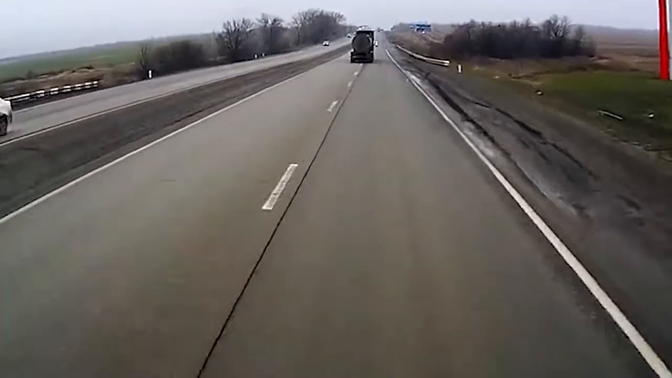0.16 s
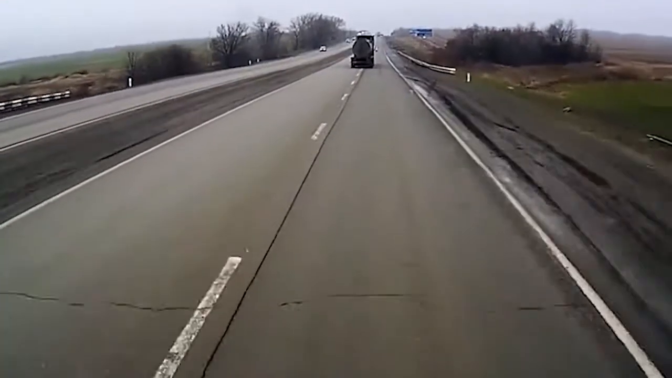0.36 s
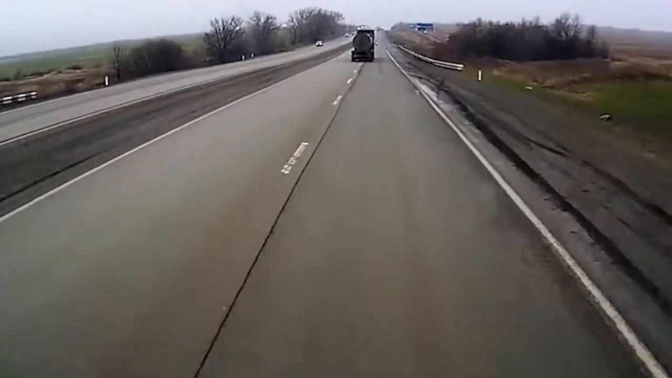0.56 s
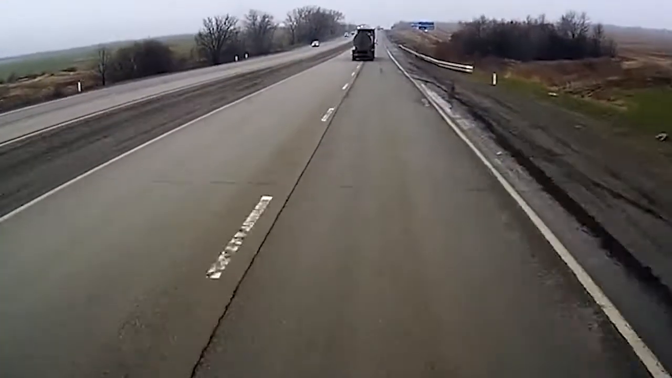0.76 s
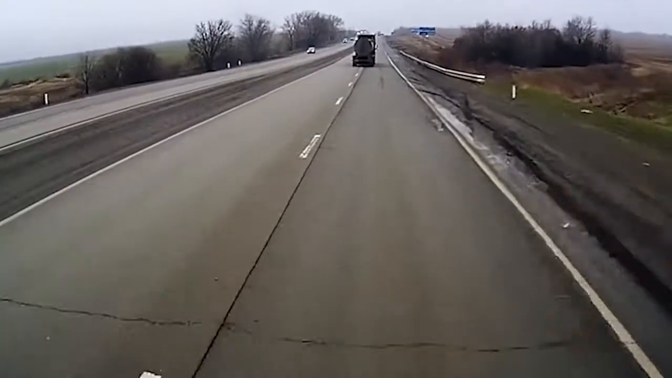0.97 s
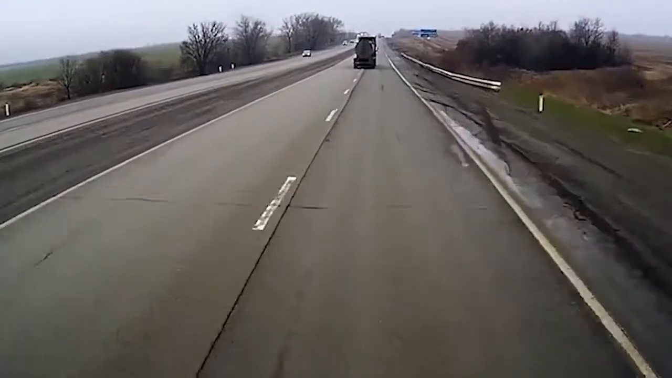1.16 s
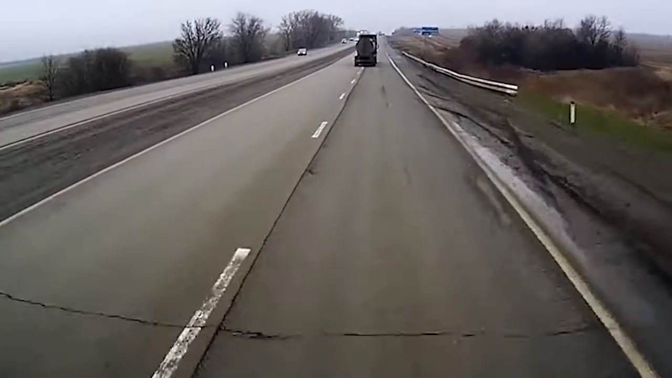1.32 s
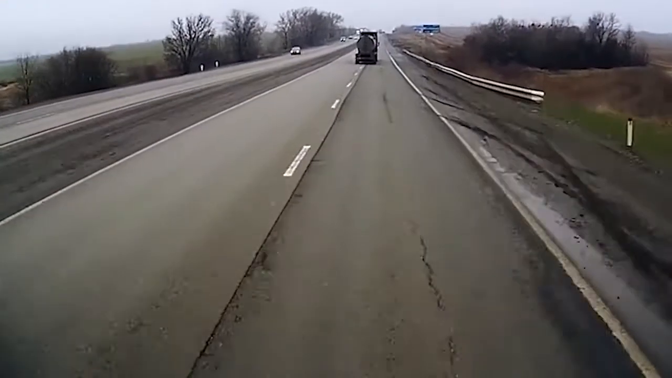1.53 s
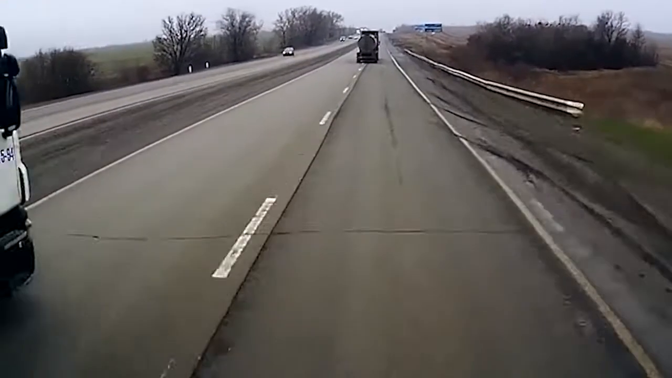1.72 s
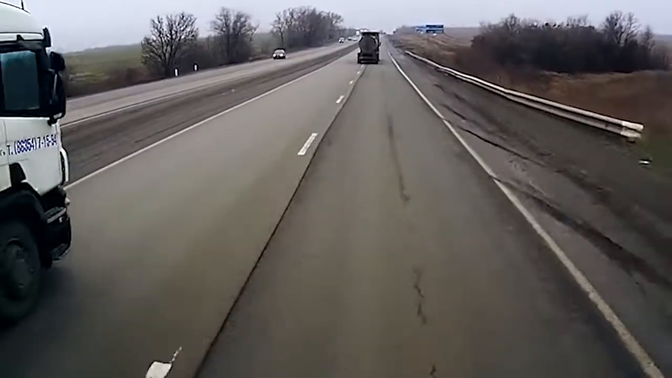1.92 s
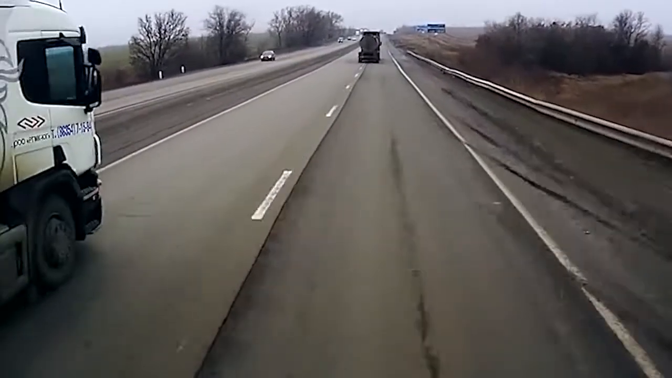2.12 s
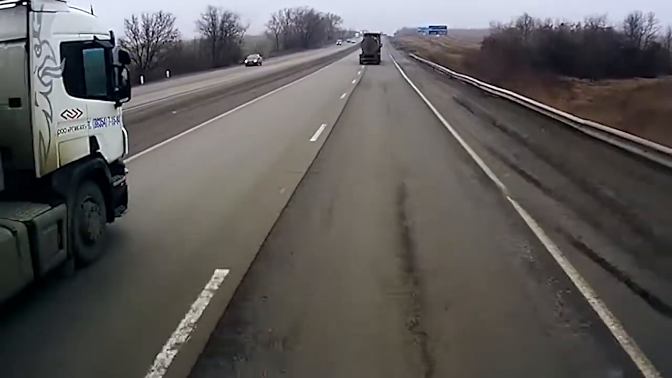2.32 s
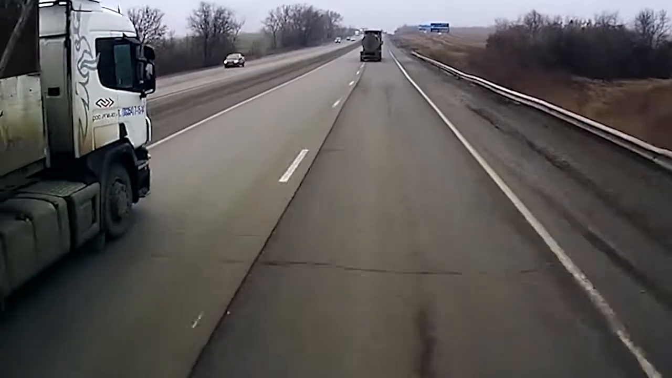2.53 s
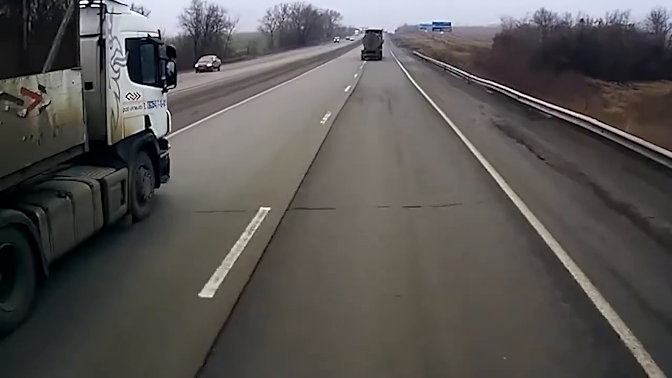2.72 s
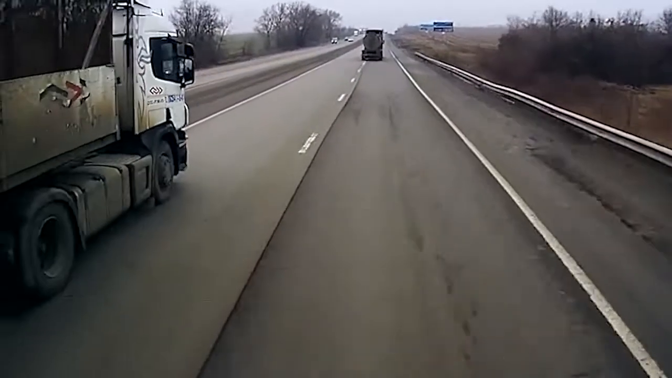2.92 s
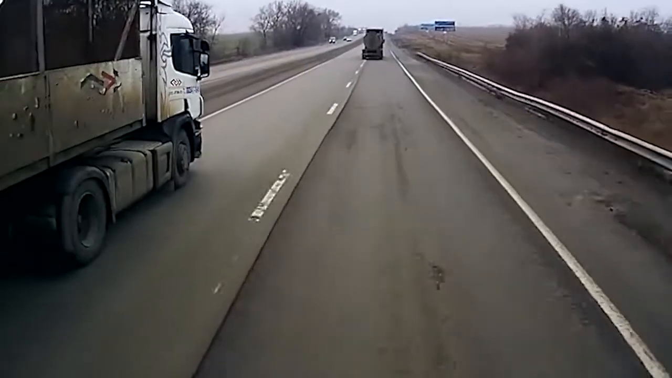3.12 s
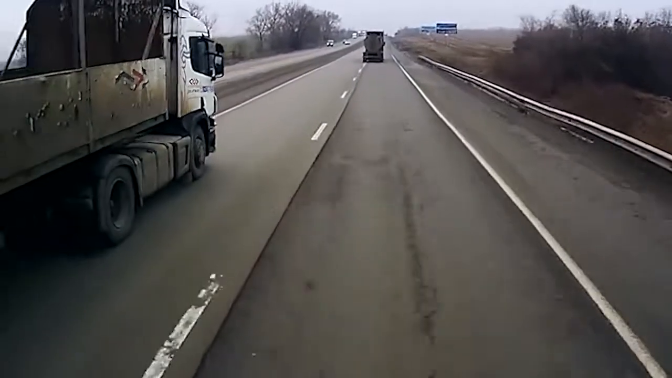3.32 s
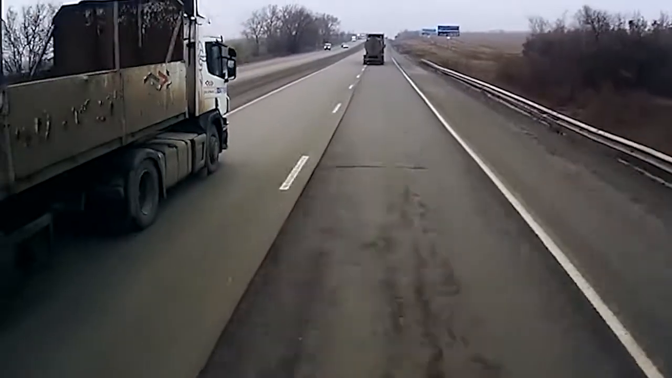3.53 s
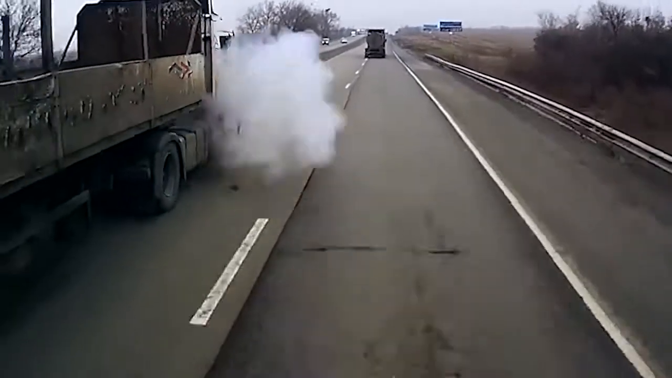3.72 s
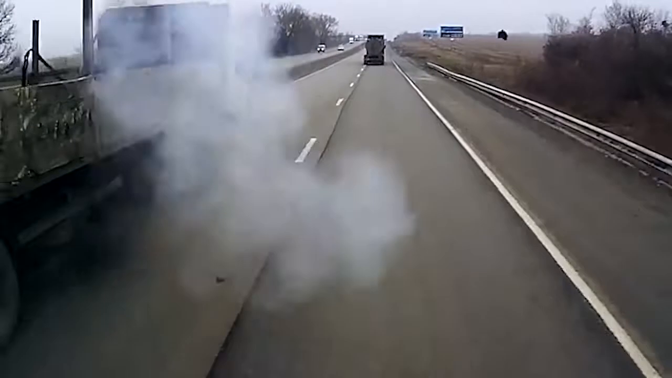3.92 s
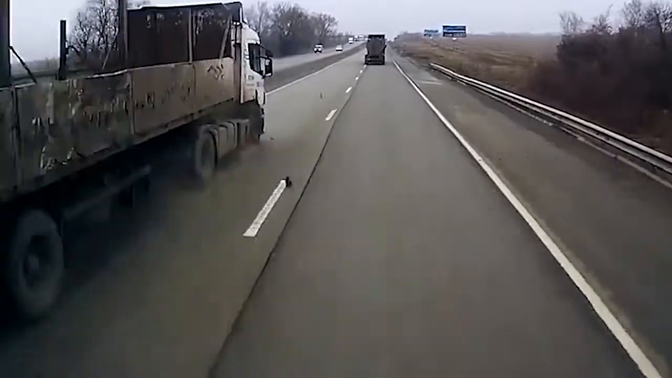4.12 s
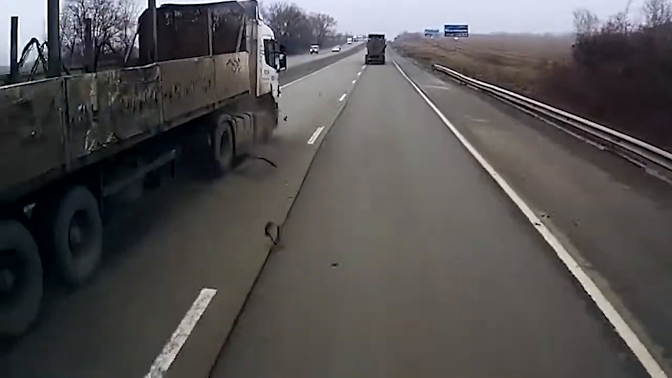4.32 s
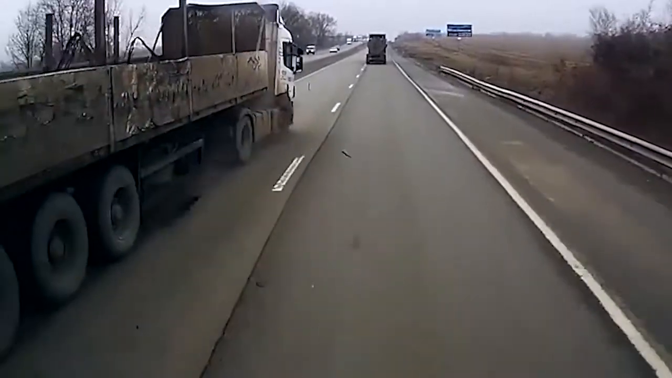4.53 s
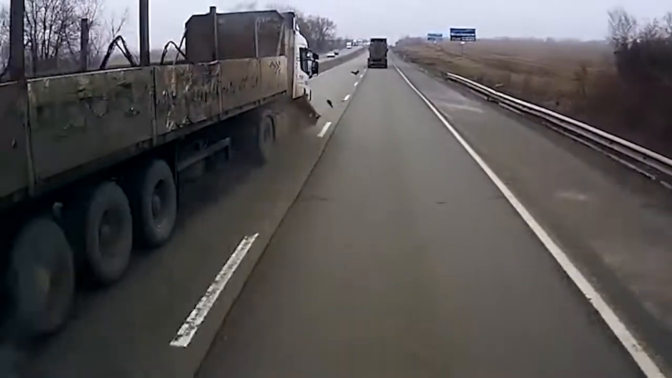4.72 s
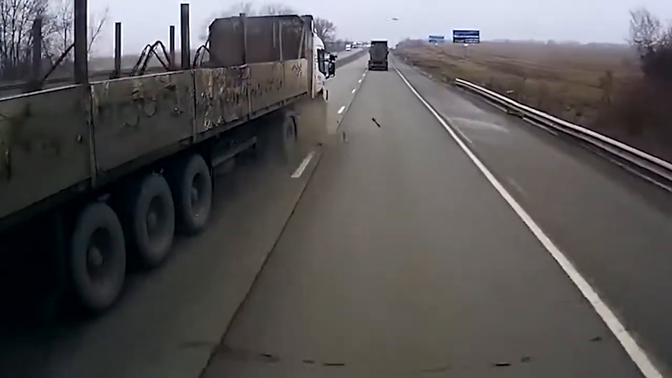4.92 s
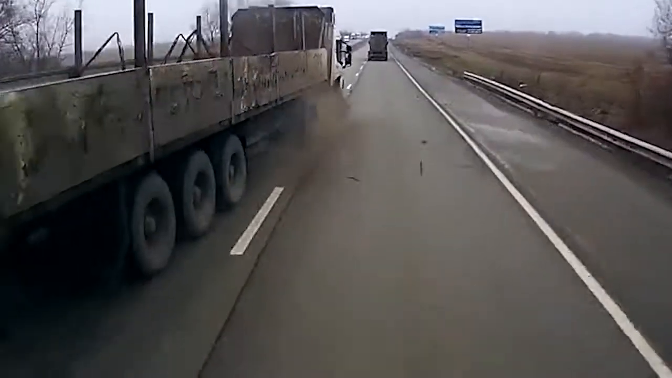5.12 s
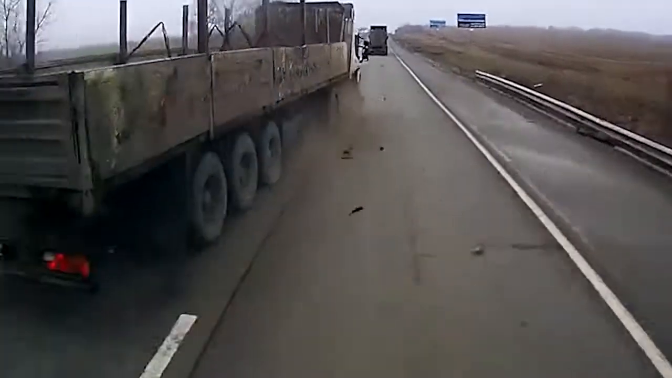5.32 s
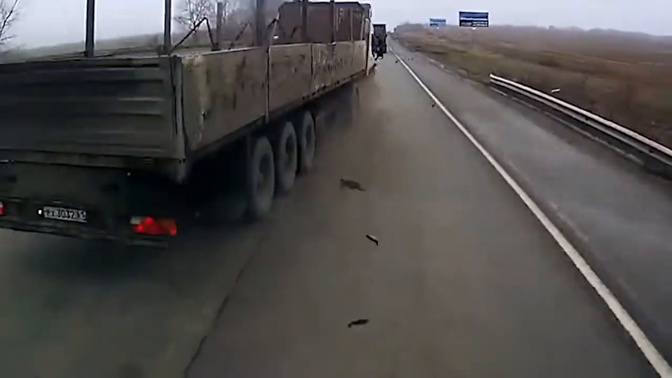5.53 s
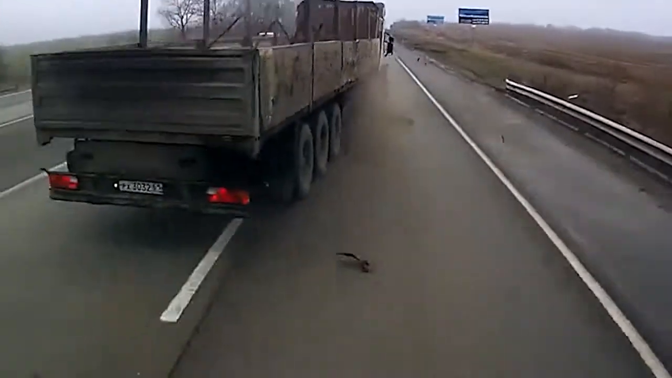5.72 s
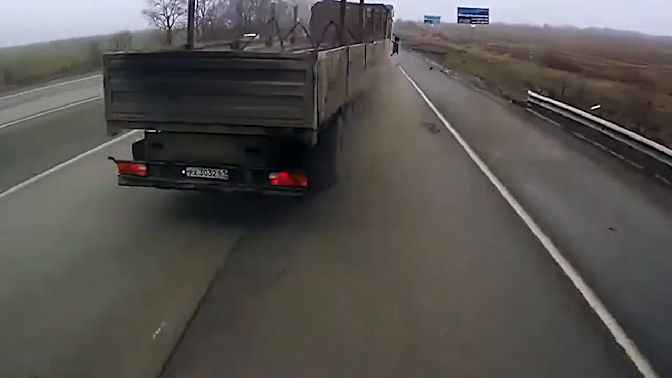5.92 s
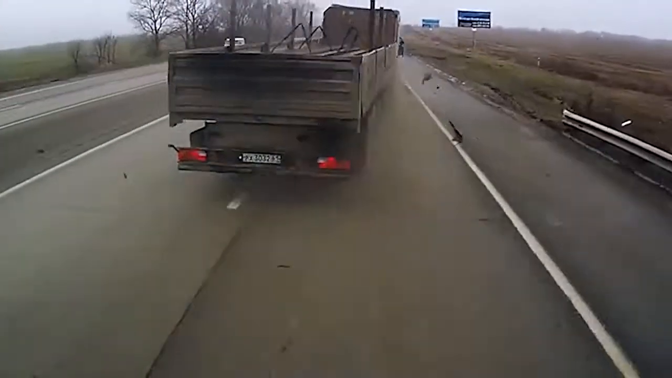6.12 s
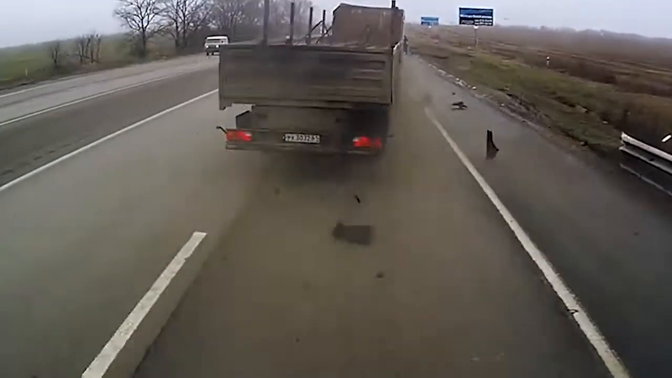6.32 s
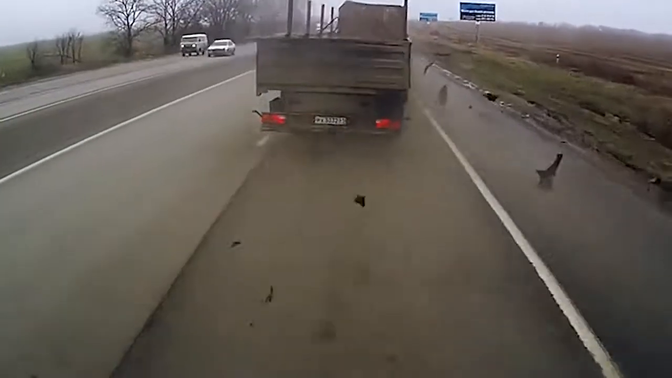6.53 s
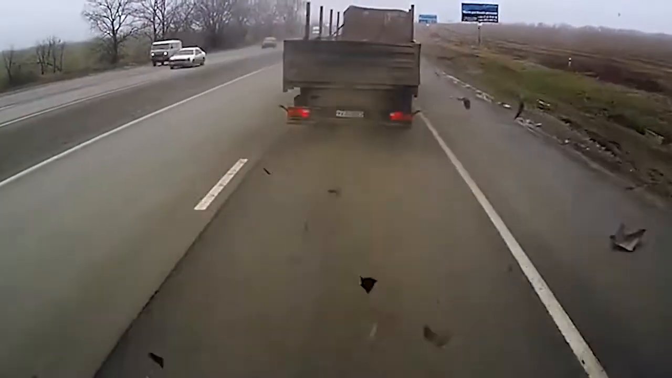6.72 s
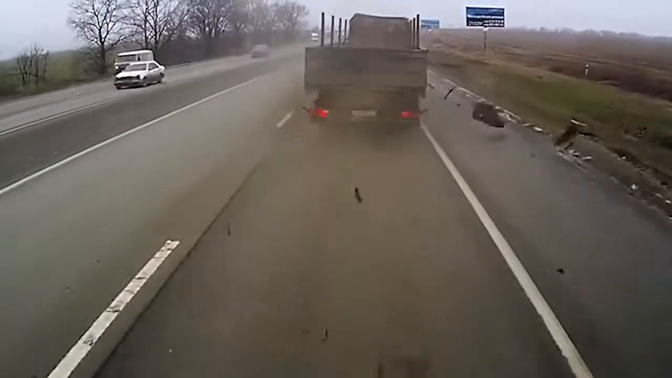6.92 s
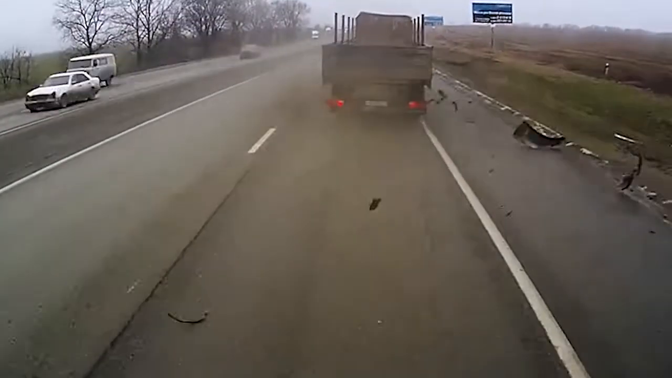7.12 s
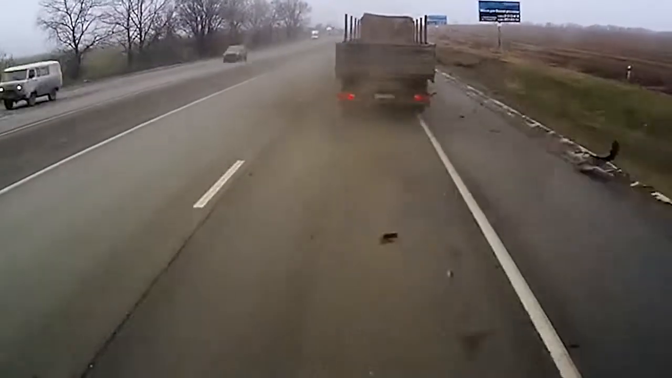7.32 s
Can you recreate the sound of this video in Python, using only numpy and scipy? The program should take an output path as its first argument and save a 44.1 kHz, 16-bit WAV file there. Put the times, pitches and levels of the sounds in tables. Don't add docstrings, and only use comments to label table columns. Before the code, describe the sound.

Inside a truck cab at highway speed, deep wind rumble and tyre roar carry a faint wavering gear whine. Midway a lorry tyre bursts alongside with a violent boom that overloads the microphone. Dull slaps, stone ticks, grit and a rough dragging drone follow, then a brief brake chirp. A large piece thuds repeatedly under the floor, shreds clatter, and the road noise sinks.

```python
import sys
import numpy as np
from scipy import signal
from scipy.io import wavfile
from scipy.ndimage import uniform_filter1d

SR = 44100
rng = np.random.default_rng(int(sys.argv[2]) if len(sys.argv) > 2 else 0)


def wav_record(signal):
    frames = np.transpose(np.atleast_2d(signal))
    bounded = np.clip(frames, -1, 1)
    quanta = np.round(bounded * 32767).astype(np.int16)
    wavfile.write(sys.argv[1], SR, quanta)


def rack_gain(trim_db):
    fader = np.asarray(trim_db, float)
    return 10 ** (fader / 20)


N = 329427

# t/s, strength/dB, push length/ms
BLAST_PUSHES = [
    (3.829, -3.5, 6),
    (3.8435, -12, 8.7),
    (3.883, -15, 3.4),
    (3.929, -33.5, 2.7),
]
# f/Hz, level/dB, T60/s
BLAST_PANELS = [(68, -3, .17), (102, -3, .12), (250, -1, .12), (355, -9, .08), (690, -20, .05)]
# t/s, f/Hz, level/dB, hold/s, T60/s
CAB_HEAVE = (3.855, 42.5, -8.5, .08, .05)
# t/s, level/dB, hold/s, T60/s
SCRAPES_AFTER = [
    (3.84, -24, .1, .5),
    (5.893, -16.5, .08, .35),
]
# t/s, strength/dB, push length/ms
FLOOR_LIFT = [(5.8675, -11.5, 9.5)]
# t/s, strength/dB, push length/ms
FLOOR_THUMPS = [
    (5.879, -8, 13.5),
    (5.889, -19, 6.2),
    (5.898, -12, 2.4),
    (5.911, -6.5, 11),
    (5.93, -22.5, 2.1),
    (5.964, -14.5, 7.4),
]
# f/Hz, level/dB, T60/s
FLOOR_PANELS = [(48, -9, .2), (118, 2, .16), (160, -2, .11), (240, -3, .1), (345, -6, .09), (395, -8, .09)]
# t/s, strength/dB, push length/ms
TREAD_SLAPS = [
    (4.097, -17, 9.7),
    (4.148, -16, 8.8),
    (4.192, -18.5, 4),
    (4.32, -16, 9),
    (4.735, -19, 2.7),
    (4.8, -22, 2.9),
]
# t/s, level/dB, T60/s, centre f/Hz, brightness/dB
SHRED_SHOWERS = [(3.834, -26, 0.11, 690, -10.5), (3.842, -37, 0.094, 1930, -8),
                 (3.881, -30.5, 0.11, 877, -5.5), (3.926, -45, .072, 2060, -3.5), (4.7, -33, 1, 510, -16.5),
                 (4.827, -33.5, .1, 870, -18.5), (5.874, -30.5, 0.084, 1160, -20.5),
                 (5.896, -35, 0.039, 1280, -10.5), (5.909, -29, 0.085, 850, -19.5),
                 (6.04, -54.5, 0.34, 2720, -7), (6.11, -42.5, 0.3, 920, -3.5), (6.183, -43, .2, 2120, 1.5),
                 (6.192, -27, .22, 780, -15), (6.223, -35.5, 0.12, 1220, -7.5),
                 (6.943, -31.5, 0.18, 1120, -10), (6.997, -36.5, 0.075, 1480, -10.5),
                 (6.944, -27, 0.25, 480, -30.5), (6.13, -35, .25, 593, -25.5),
                 (7.294, -55, 0.14, 2000, -1.5)]
# t/s, level/dB, f/Hz, width/Hz, rise/s, T60/s
BRACKET_RING = (6.138, -38, 1780, 380, .012, .09)
# t/s, peak level/dB, brightness/dB
STONE_HITS = [(3.959, -41, -21.5), (4.0189, -49.5, -20), (4.0844, -37.5, -38), (4.104, -49.5, -4.5),
              (4.2132, -42.5, -32), (4.305, -39.5, -33), (4.3385, -42, -30), (4.3536, -39.5, -22.5),
              (4.6076, -50, -36), (4.636, -45.5, -26), (4.852, -41.5, -18), (5.028, -40.5, -34),
              (5.0963, -42, -29), (5.3508, -48.5, -5), (5.4037, -34, -24), (5.4803, -42.5, -21),
              (5.722, -34, -39), (5.7943, -39.5, -23), (5.8163, -37, -37), (5.848, -39, -17),
              (5.9877, -57, -4), (6.299, -44.5, -16.5), (6.343, -38.5, -23.5), (6.4936, -47.5, -20),
              (6.6592, -48, -11), (6.7213, -46.5, -27), (6.7883, -41.5, -32), (7.1867, -42, -34),
              (7.2681, -39.5, -40), (7.283, -42.5, -38)]
# t/s,
# length/s, level/dB, centre f/Hz, width/Hz
AIR_HISSES = [(3.837, 0.12, -59.5, 5800, 8970), (3.836, 0.065, -59, 3000, 4000),
              (5.715, .03, -60.5, 3700, 3400), (5.475, .03, -66.5, 4800, 6000),
              (5.211, .07, -70.5, 8000, 7000), (5.876, .018, -72, 5900, 6000),
              (6.032, 0.077, -73, 8750, 1500), (6.19, .022, -59, 8700, 1100),
              (2.147, .014, -65, 5500, 1000), (3.677, .009, -65.5, 5100, 1000),
              (6.8, .006, -67, 5500, 3000), (5.872, .012, -53, 4300, 3000),
              (7.4025, 0.0063, -55, 1900, 1400)]
# f/Hz, level/dB
WALL_COLOUR = [(900, -6), (1800, 13.5), (2300, -7), (2900, 3.5), (3300, -13), (3700, -10.5), (5000, -11),
               (6200, -25), (8500, -21), (11000, -36.5), (15000, -32.5)]
# t/s, level/dB
DRAG_LEVEL = [(3.95, -33), (4.5, -32.5), (4.74, -26.5), (4.95, -27), (5.5, -31.5), (6.0, -26),
              (6.55, -38.5), (7.47, -30.5)]
# f/Hz, width/Hz, level/dB
DRAG_FLOOR = [(168, 90, -2), (253.4, 40, -0.5), (300.2, 26, -4), (336, 50, -6.5), (480, 60, -11)]
# t/s, length/s, f/Hz, level/dB
BRAKE_CHIRPS = [(.704, 0.0087, 5500, -66), (0.713, .012, 5550, -56), (.738, .034, 7950, -73),
                (5.22, 0.032, 5865, -59.5), (5.218, .03, 7880, -67), (5.238, 0.039, 4930, -60),
                (5.27, 0.033, 5060, -58), (5.238, 0.042, 10480, -77), (5.248, .018, 8410, -69),
                (5.257, 0.036, 3016, -57), (5.26, .02, 5250, -65), (5.274, 0.034, 5400, -58.5),
                (5.293, 0.02, 6250, -68), (5.293, .028, 12655, -73), (5.305, 0.013, 7490, -65),
                (5.31, .042, 7880, -65)]
# f/Hz, width/Hz
GEAR_MESH = [(389.5, 3.93), (745, 8)]
MESH_IDLE_DB = [-51.5, -56.5]
# middle t/s, length/s, level/dB
LOW_MESH_SWELLS = [(0.164, 0.22, -41), (.5, 0.31, -41.5), (1.15, 0.48, -33), (1.618, 0.54, -36),
                   (2.113, 0.23, -41.5), (2.422, 0.16, -39), (3.112, 0.54, -40.5), (3.685, .3, -38.5),
                   (4.294, 0.65, -36.5), (4.773, 0.12, -31), (5.262, 0.11, -36)]
# middle t/s, length/s, level/dB
HIGH_MESH_SWELLS = [(.2, 0.09, -52), (1.007, 0.6, -50.5), (1.465, 0.085, -44), (1.71, 0.14, -50.5),
                    (1.99, 0.1, -40.5), (2.42, 0.1, -42.5), (3.066, 0.52, -38), (3.654, 0.15, -47),
                    (3.878, 0.11, -42), (4.863, 0.091, -34), (5.27, .15, -47)]
# t/s, level/dB
ROAD_PACE = [(0.0, -2.5), (0.9, -1.5), (1.7, -0.5), (3.5, -0.5), (5.0, -1.26), (5.8, -2), (6.3, -2.5),
             (6.7, -7), (7.47, -8)]
# f/Hz, level per Hz/dB
RUMBLE_COLOUR = [(7.1, -19.5), (12, 5), (27, -0.5), (35, -11), (49, -4), (80, -7.5), (170, -17), (220, -52),
                 (370, -120)]
# f/Hz, level per Hz/dB
ROAR_COLOUR = [(88, -24.5), (150, 3), (210, -1), (300, -1.5), (394, -1), (515, -9.5), (648, -8.5),
               (817, -8.5), (993, -12.5), (1250, -26), (1620, -56), (2750, -120)]
# f/Hz, level per Hz/dB
HISS_COLOUR = [(800, -23.5), (1150, -1), (1500, -0.5), (1800, -5), (2000, -8), (2300, -16), (2850, -13),
               (3200, -19), (3500, -25.5), (4300, -27.5), (5100, -24.5), (5700, -30), (6300, -39),
               (7500, -53)]
# f/Hz, level/dB
CIRCUIT_COLOUR = [(4000, -14.5), (6300, -7), (9000, -3.5), (11500, -9), (13000, -7), (15500, -11),
                  (17000, -23.5)]
# f/Hz, level/dB
APART_COLOUR = [(4000, -16), (6000, -3), (9000, -2.5), (11800, -5), (12400, -10), (15500, -7)]
# f/Hz, level/dB
STRAIN_COLOUR = [(300, -8), (900, 0), (2500, -6), (5000, -14), (10000, -20), (15500, -24)]

BURST_S = 3.83
LIMIT = .447


def evened(x):
    return x / np.sqrt(np.mean(x ** 2) + 1e-20)


def column(rows, k):
    rows = np.array(rows)
    return np.interp(np.arange(N) / SR, rows[:, 0], rows[:, k])


def ramp(s, length):
    return np.clip((np.arange(N) / SR - s) / length, 0, 1)


def fading(t, db, held, t60):
    return rack_gain(db - 60 * np.maximum(t - held, 0) / t60)


def add(mix, s, sound):
    part = mix[round(s * SR):][:len(sound)]
    part += sound[:len(part)]


def resonate(x, hz, width, times=2):
    for _ in range(times):
        x = signal.lfilter(*signal.iirpeak(hz, hz / width, SR), x)
    return x


def drift(seconds):
    span = max(int(seconds * SR), 1)
    return evened(uniform_filter1d(uniform_filter1d(rng.standard_normal(N), span), span))


def lumpy(length, grain, spread_db):
    jumps = rng.standard_normal(length // grain + 1).repeat(grain)[:length]
    return rng.standard_normal(length) * rack_gain(spread_db * jumps)


def noise(points, size, patchy_db, gust_db):
    frames, hz = 4 * N // size + 5, np.fft.rfftfreq(size, 1 / SR)
    a, b, patches = rng.standard_normal((frames, len(hz), 3)).T
    patches = evened(uniform_filter1d(uniform_filter1d(patches, 8, 0), 8, 1))
    gusts = evened(uniform_filter1d(rng.standard_normal(frames), 4))
    f, level_db = np.transpose(points)
    colour_db = np.interp(np.log(hz + 1), np.log(f + 1), level_db, left=-120, right=-120)
    z = (a + 1j * b) * rack_gain(colour_db[:, None] + patchy_db * patches + gust_db * gusts)
    return evened(signal.istft(z, nperseg=size, noverlap=size * 3 // 4)[1][:N])


def through_wall(x):
    hz, level_db = np.transpose(WALL_COLOUR)
    grid = np.linspace(0, SR / 2, 257)
    taps = signal.firwin2(511, grid, rack_gain(np.interp(grid, hz, level_db)) ** 2, fs=SR)
    return signal.oaconvolve(x, signal.minimum_phase(taps))[:len(x)]


def blows(rows, modes, ring_db, sharp):
    t, out = np.arange(SR // 2) / SR, np.zeros(N)
    ring = sum(fading(t, db, 0, t60) * np.sin(2 * np.pi * hz * t) for hz, db, t60 in modes)
    for s, db, ms in rows:
        u = t * 1000 / ms
        push = (1 - u ** 4) * np.exp(-u ** 4 / 3)
        add(out, s, rack_gain(db) * np.tanh(sharp * u) * (push + rack_gain(ring_db) * ring))
    return out


def shudder(scrape, modes):
    s, db, held, t60 = scrape
    t, out = np.arange(SR) / SR, np.zeros(N)
    drive = rng.standard_normal(SR)
    panels = sum(rack_gain(level_db) * evened(resonate(drive, hz, 50)) for hz, level_db, _ in modes)
    add(out, s, fading(t, db, held, t60) * np.tanh(t / 0.004) * evened(panels))
    return out


def heave():
    s, hz, db, held, t60 = CAB_HEAVE
    t, out = np.arange(SR // 2) / SR, np.zeros(N)
    add(out, s, fading(t, db, held, t60) * np.sin(2 * np.pi * hz * t))
    return out


def tyre_burst():
    slam = blows(BLAST_PUSHES, BLAST_PANELS, ring_db=0, sharp=2.7)
    return slam + heave() + shudder(SCRAPES_AFTER[0], BLAST_PANELS)


def floor_thump():
    lift = 1.6 * blows(FLOOR_LIFT, FLOOR_PANELS, ring_db=-22, sharp=.8)
    tumble = blows(FLOOR_THUMPS, FLOOR_PANELS, ring_db=-1.0, sharp=2.1)
    return lift + tumble + shudder(SCRAPES_AFTER[1], FLOOR_PANELS)


def tread_slaps():
    return blows(TREAD_SLAPS, FLOOR_PANELS, ring_db=-14.5, sharp=1.4)


def showers():
    t, out = np.arange(SR // 2) / SR, np.zeros(N)
    for s, db, t60, hz, bright_db in SHRED_SHOWERS:
        rise = 0.074 * t60
        grains = lumpy(len(t), grain=80, spread_db=2.2)
        body = evened(resonate(grains, hz, 1.1 * hz, times=3))
        fizz = rack_gain(bright_db + 5 - 55 * t / t60) * evened(through_wall(grains))
        add(out, s, fading(t, db, rise, t60) * np.minimum(t / rise, 1) * (body + fizz))
    return out


def bracket():
    s, db, hz, width, rise, t60 = BRACKET_RING
    t, out = np.arange(SR // 2) / SR, np.zeros(N)
    ring = evened(resonate(rng.standard_normal(len(t)), hz, width))
    add(out, s, fading(t, db, rise, t60) * np.minimum(t / rise, 1) * ring)
    return out


def stones():
    t, out = np.arange(4000) / SR, np.zeros(N)
    sheet_hz, sheet_spread, sheet_t60_s, tick_t60_s = 2680, .05, .06, .036
    top = signal.butter(2, [5500, 12000], "band", fs=SR)
    chance = rng.standard_normal((len(STONE_HITS), len(t)))
    cracks = through_wall(resonate(chance.ravel(), 4600, 5000, times=1))
    cracks = evened(cracks).reshape(chance.shape)
    for (s, db, top_db), rough, crack in zip(STONE_HITS, chance, cracks):
        hz = sheet_hz * (1 + sheet_spread * rough[-1])
        ring = evened(resonate(rough, hz, 800)) * fading(t, 0, 0, sheet_t60_s)
        bright = rack_gain(top_db + 4) * evened(signal.lfilter(*top, rough))
        tick = (1.6 * crack + bright) * fading(t, 0, 0, tick_t60_s)
        add(out, s, rack_gain(db - 12.5) * np.minimum(t / 0.0012, 1) * (ring + tick))
    return out


def grit():
    early_per_s, late_per_s, thins_s = 105, 25, 6.3
    per_s = early_per_s * ramp(BURST_S, .1) - (early_per_s - late_per_s) * ramp(thins_s - .3, .6)
    strengths = rack_gain(3.5 * np.minimum(rng.exponential(1, N), 3))
    hits = strengths * (rng.random(N) < per_s / SR)
    decay = fading(np.arange(1500) / SR, 0, 0, 0.036)
    rattle = signal.oaconvolve(hits, decay)[:N] * rng.standard_normal(N)
    return rack_gain(-53.5) * through_wall(np.diff(rattle, prepend=0))


def hisses():
    out = np.zeros(N)
    for s, length, db, hz, width in AIR_HISSES:
        air = lumpy(SR // 4, grain=100, spread_db=3.4)
        band = evened(resonate(air, hz, width))[:int(length * SR)]
        add(out, s, rack_gain(db) * band * signal.windows.tukey(len(band), .3))
    return out


def drag():
    rubbing = rng.standard_normal(N) * rack_gain(2.3 * drift(0.028))
    floor = sum(rack_gain(db) * evened(resonate(rubbing, hz, width)) for hz, width, db in DRAG_FLOOR)
    return rack_gain(column(DRAG_LEVEL, k=1) - 4.0) * ramp(DRAG_LEVEL[0][0], 0.11) * evened(floor)


def chirps():
    out = np.zeros(N)
    for s, length, hz, db in BRAKE_CHIRPS:
        t = np.arange(0, length, 1 / SR)
        rough = uniform_filter1d(rng.standard_normal(len(t)), 90)
        turns = np.cumsum(hz * (1 + .25 * (t - length / 2) + .1 * rough)) / SR
        add(out, s, rack_gain(db) * np.sin(2 * np.pi * turns) * signal.windows.tukey(len(t), .7))
    return out


def gears():
    t, out = np.arange(N) / SR, np.zeros(N)
    all_swells = [LOW_MESH_SWELLS, HIGH_MESH_SWELLS]
    for (hz, width), swells, idle_db in zip(GEAR_MESH, all_swells, MESH_IDLE_DB):
        turns = hz * t + np.cumsum(.4 * width * drift(0.032)) / SR
        load = np.full(N, rack_gain(idle_db))
        for s, length, db in swells:
            load += rack_gain(db) * np.exp(-(2 * (t - s) / length) ** 2)
        out += load * np.sqrt(2) * np.sin(2 * np.pi * turns)
    return out * (1 - ramp(4.35, 0.98))


def road():
    pace_db = column(ROAD_PACE, k=1)
    rocking = ramp(BURST_S + 0.12, 0.096) - ramp(BURST_S + 0.41, 0.28)
    flapping = ramp(BURST_S, .4) - ramp(5.9, 0.064)
    rumble_level = rack_gain(-24.5 + 0.22 * pace_db + 5.5 * rocking)
    roar_level = rack_gain(-31 + 1.21 * pace_db)
    hiss_level = rack_gain(-50.2 + 0.74 * pace_db + 3 * flapping)
    rumble = rumble_level * noise(RUMBLE_COLOUR, size=8192, patchy_db=0.52, gust_db=1.4)
    roar = roar_level * noise(ROAR_COLOUR, size=2048, patchy_db=1.16, gust_db=.5)
    hiss = hiss_level * noise(HISS_COLOUR, size=512, patchy_db=1.17, gust_db=0.73)
    return rumble + roar + hiss


def supply_whistle():
    turns = np.cumsum(7490 + 95 * drift(.003)) / SR
    octave = rack_gain(-88.5 + 5 * drift(.008)) * np.sin(4 * np.pi * turns)
    return rack_gain(-86) * np.sin(2 * np.pi * turns) + octave


def scene():
    cab = tyre_burst() + floor_thump() + tread_slaps()
    cab += showers() + bracket() + stones() + grit() + hisses()
    cab += drag() + chirps() + gears() + road()
    return np.array([cab, cab])


def top_cut(x):
    return signal.sosfilt(signal.butter(12, 15500, fs=SR, output="sos"), x)


def record(dry):
    shared = rack_gain(-82) * noise(CIRCUIT_COLOUR, size=512, patchy_db=1.5, gust_db=1.5)
    apart = rack_gain(-91.5) * noise(APART_COLOUR, size=1024, patchy_db=4.0, gust_db=4.0)
    apart += rack_gain(-60.0) * drift(0.015)
    strain = uniform_filter1d(1.0 * (abs(dry[0]) > .92 * LIMIT), 1200) ** .5
    apart += rack_gain(-48) * strain * noise(STRAIN_COLOUR, size=256, patchy_db=2.0, gust_db=2.0)
    sides = np.array([[1], [-1]])
    wired = dry + np.sqrt(2) * supply_whistle() + shared + sides * apart
    limit = LIMIT * rack_gain(sides * (.06 + .05 * drift(.0002)))
    return top_cut(np.clip(wired, -limit, limit))


dry = scene()
out = record(dry)
wav_record(out)
```